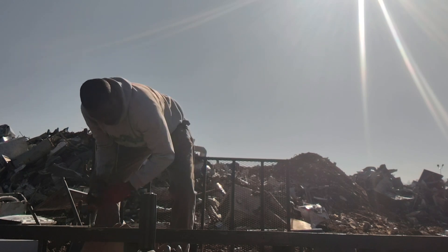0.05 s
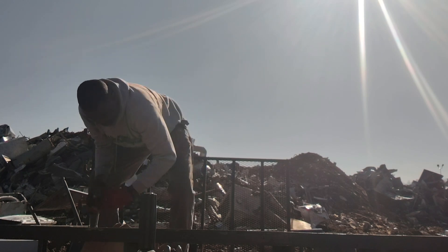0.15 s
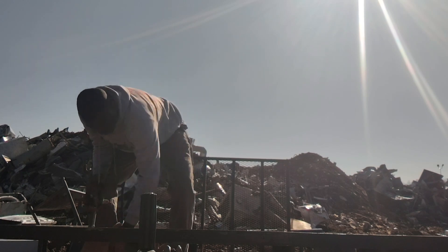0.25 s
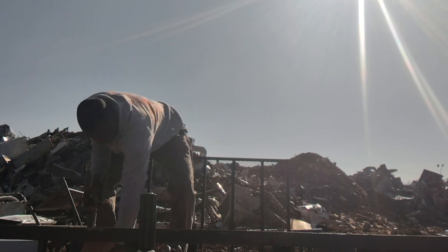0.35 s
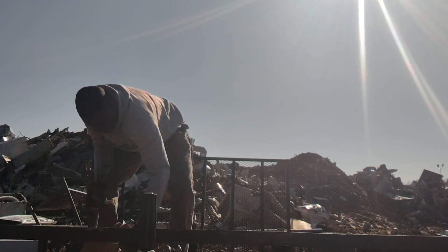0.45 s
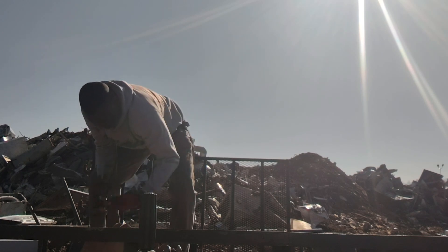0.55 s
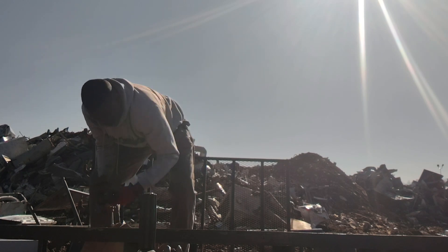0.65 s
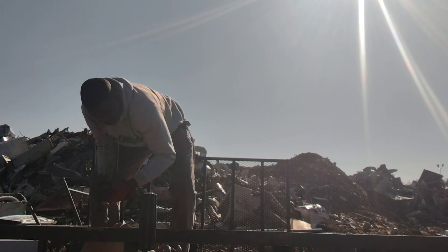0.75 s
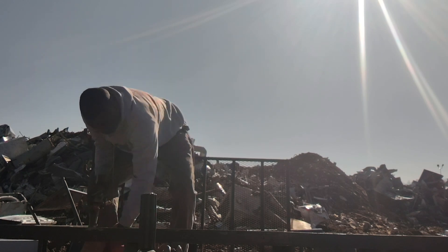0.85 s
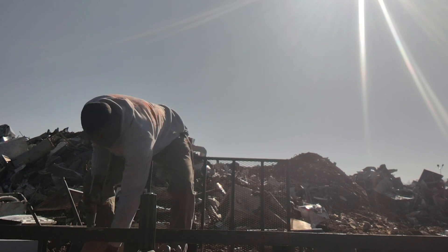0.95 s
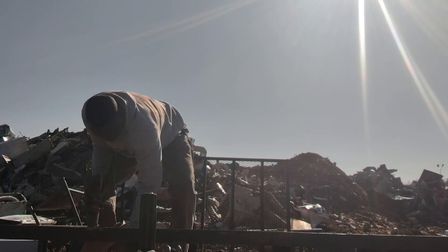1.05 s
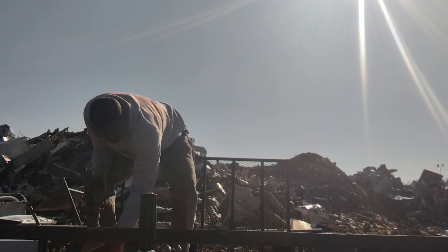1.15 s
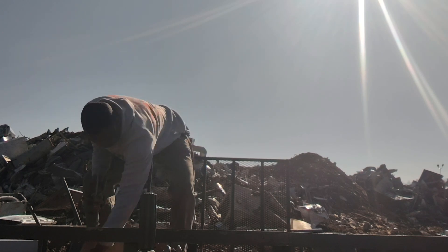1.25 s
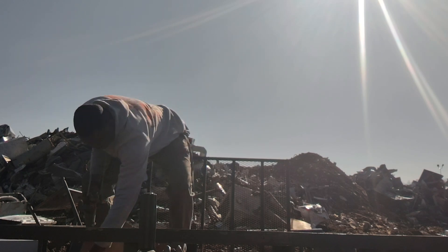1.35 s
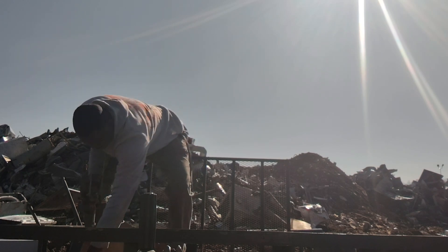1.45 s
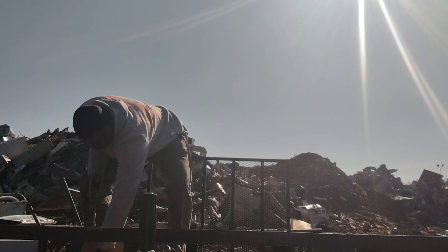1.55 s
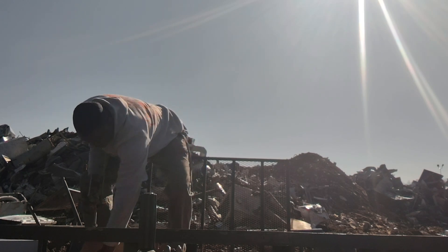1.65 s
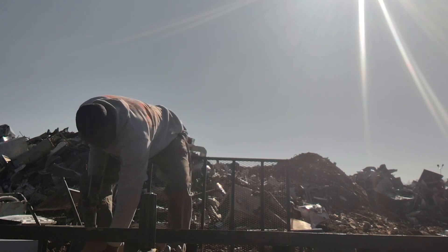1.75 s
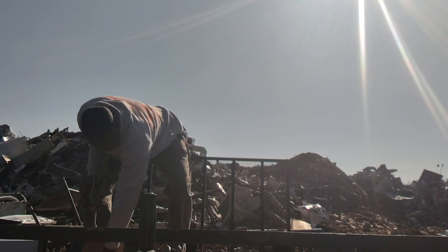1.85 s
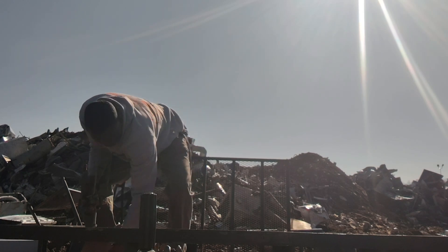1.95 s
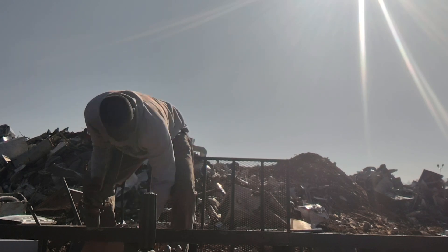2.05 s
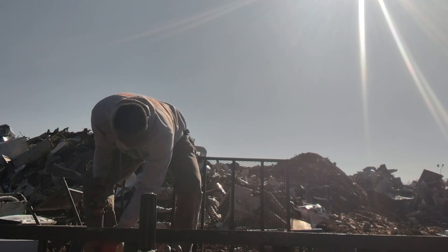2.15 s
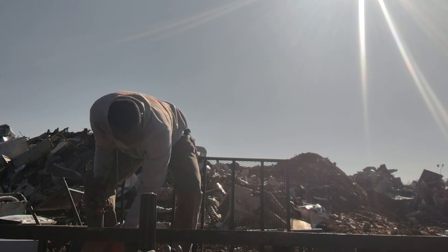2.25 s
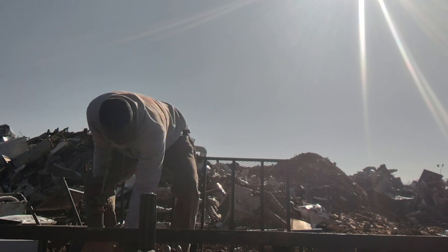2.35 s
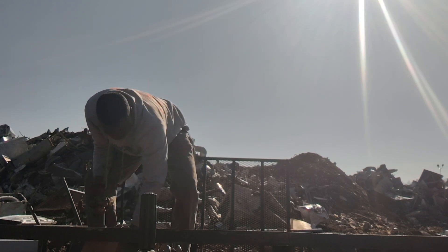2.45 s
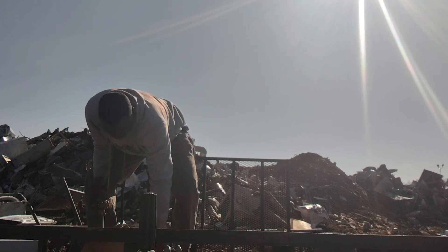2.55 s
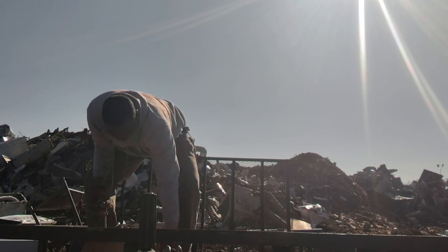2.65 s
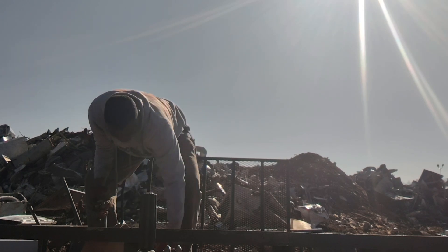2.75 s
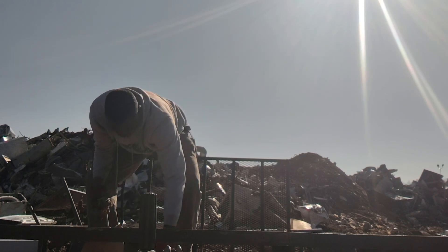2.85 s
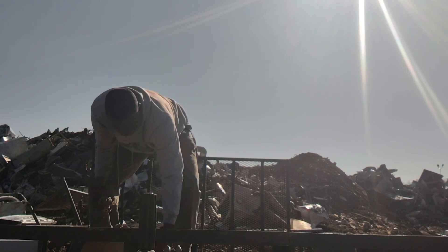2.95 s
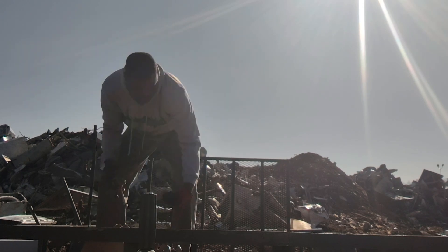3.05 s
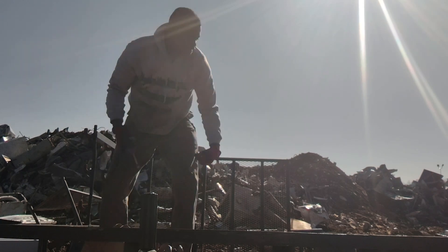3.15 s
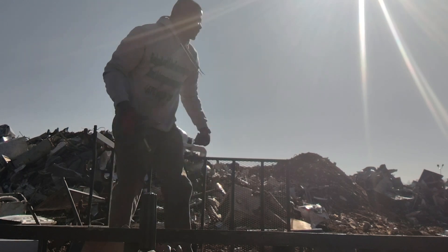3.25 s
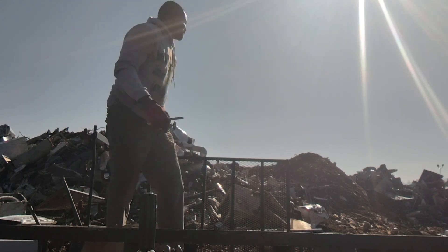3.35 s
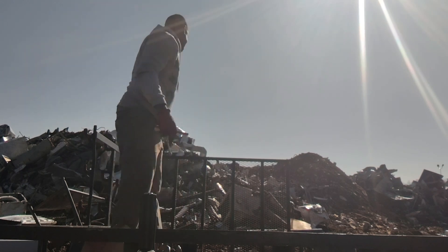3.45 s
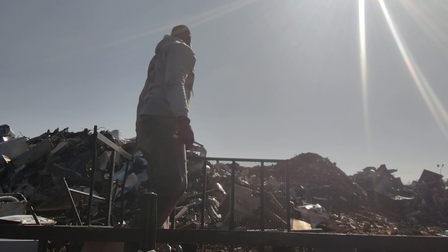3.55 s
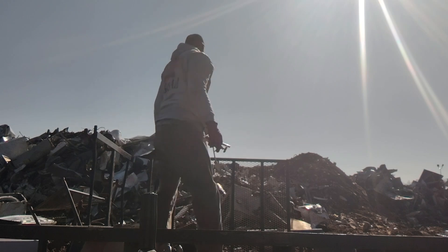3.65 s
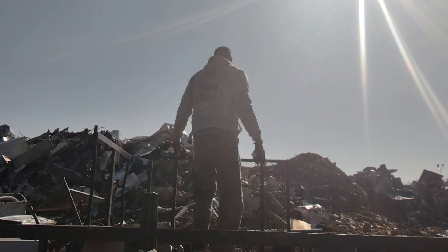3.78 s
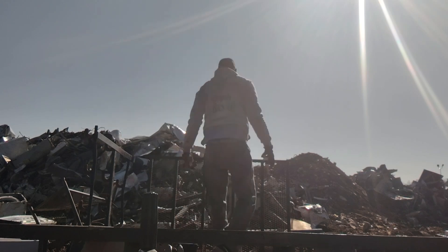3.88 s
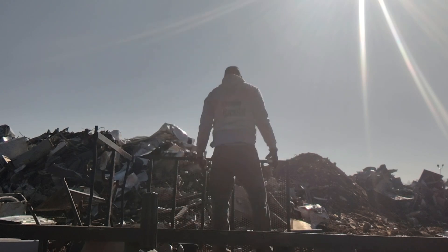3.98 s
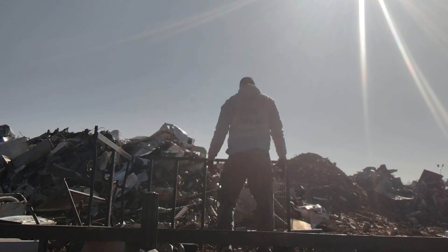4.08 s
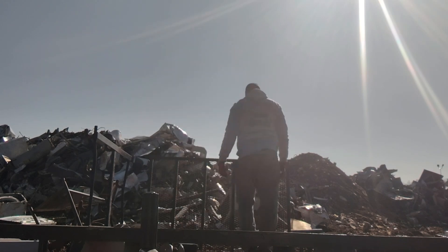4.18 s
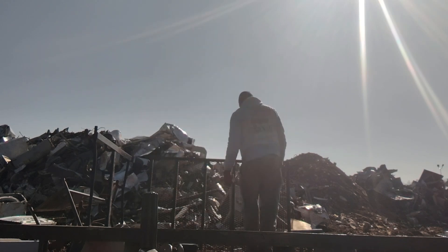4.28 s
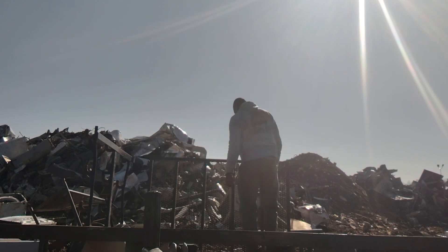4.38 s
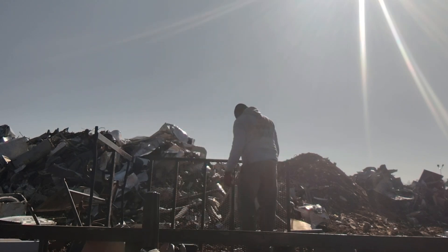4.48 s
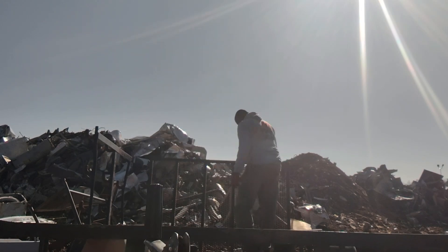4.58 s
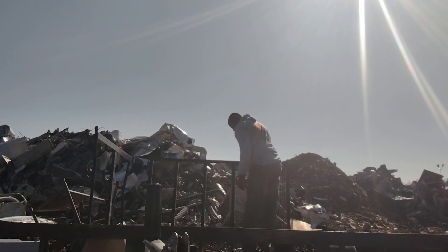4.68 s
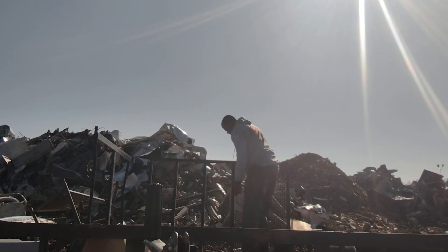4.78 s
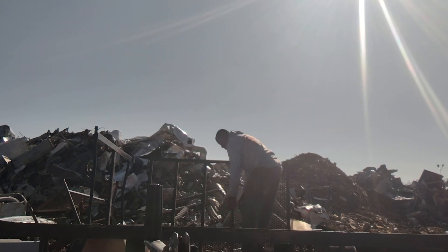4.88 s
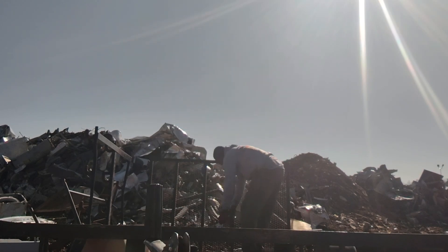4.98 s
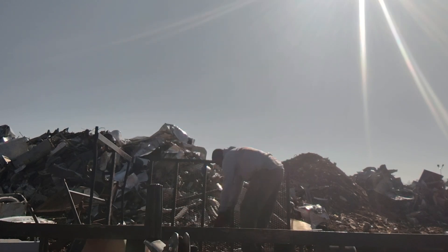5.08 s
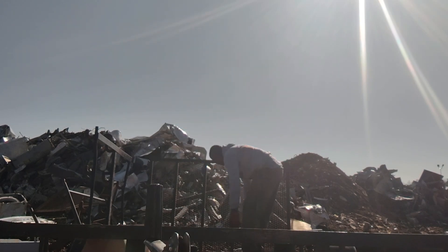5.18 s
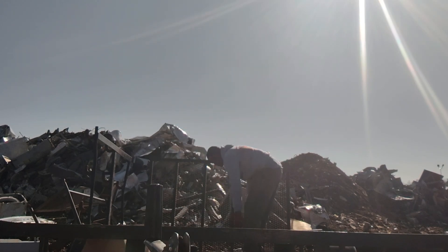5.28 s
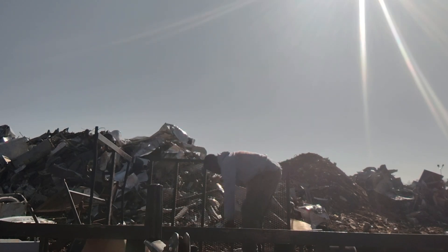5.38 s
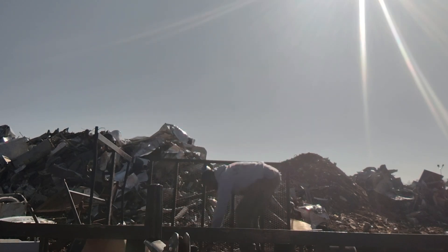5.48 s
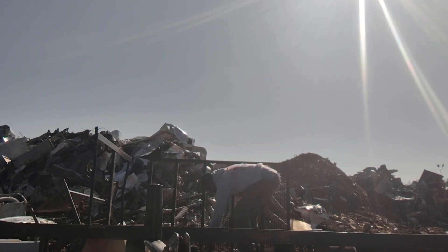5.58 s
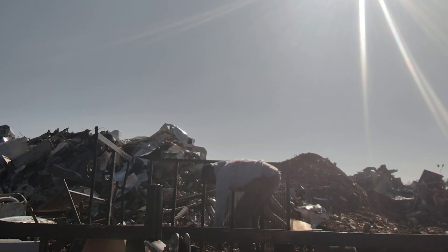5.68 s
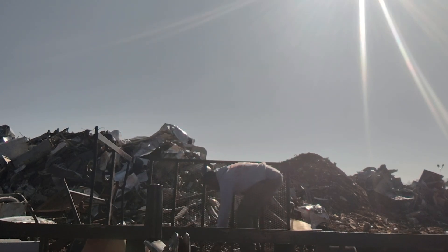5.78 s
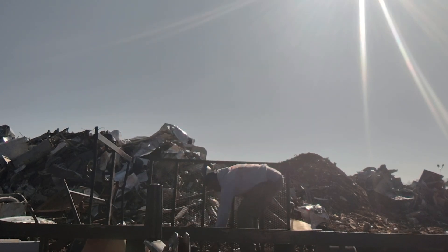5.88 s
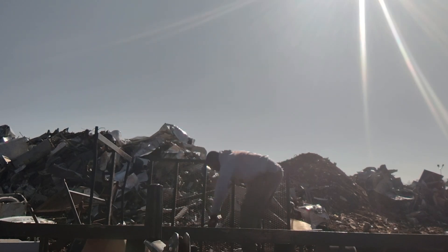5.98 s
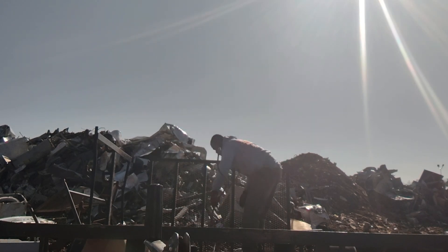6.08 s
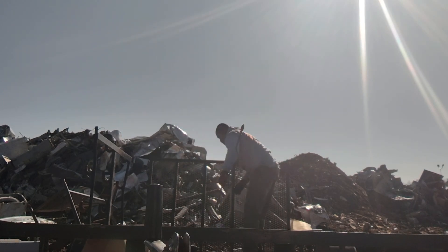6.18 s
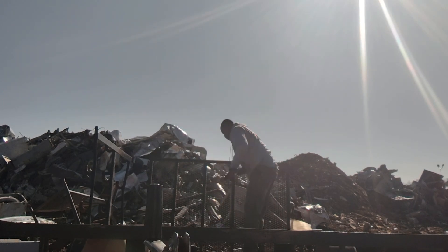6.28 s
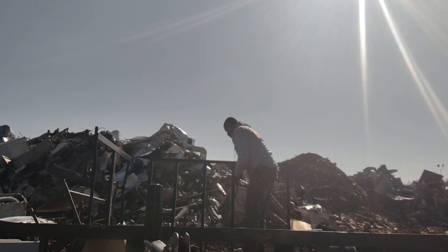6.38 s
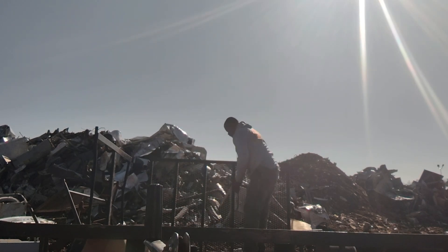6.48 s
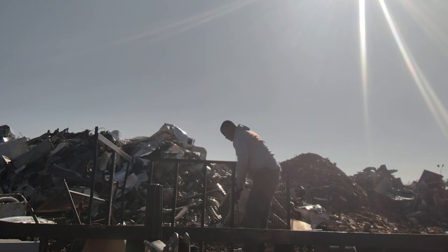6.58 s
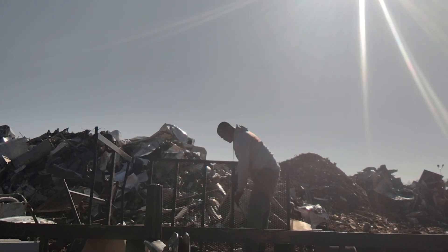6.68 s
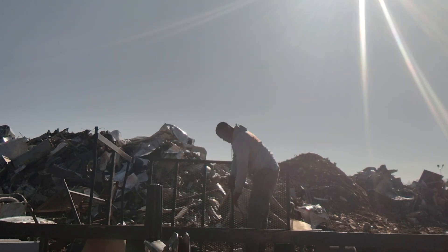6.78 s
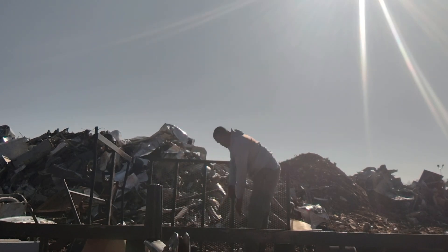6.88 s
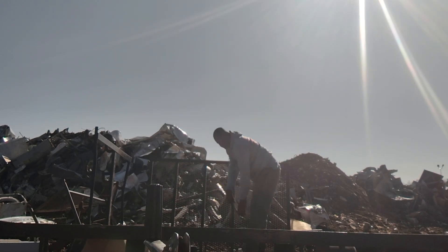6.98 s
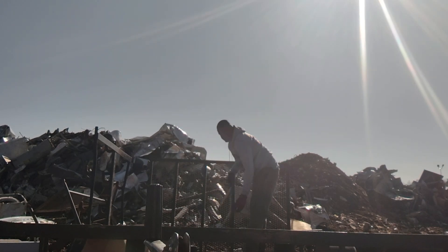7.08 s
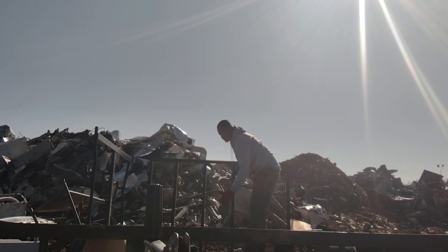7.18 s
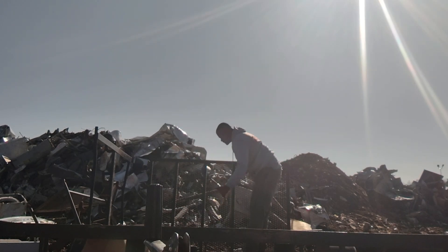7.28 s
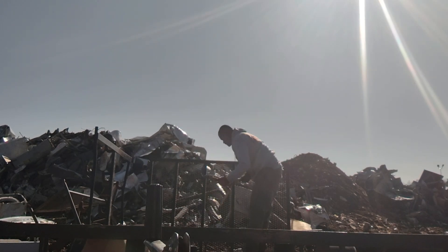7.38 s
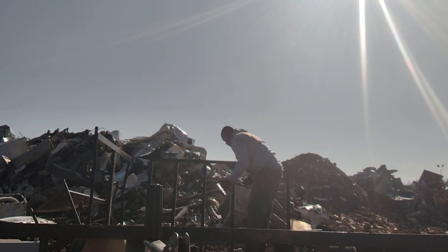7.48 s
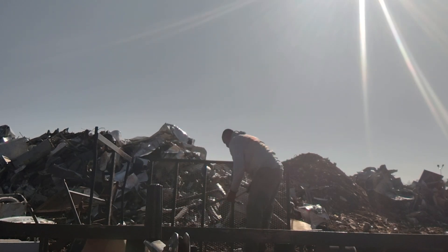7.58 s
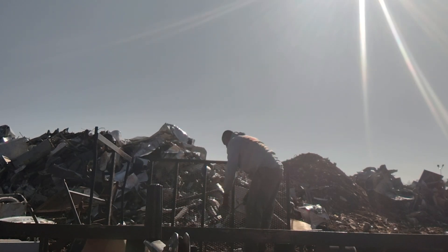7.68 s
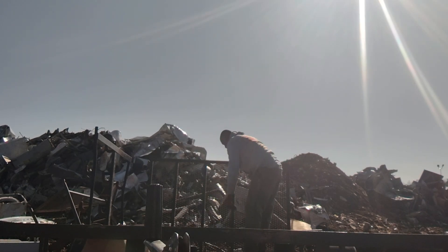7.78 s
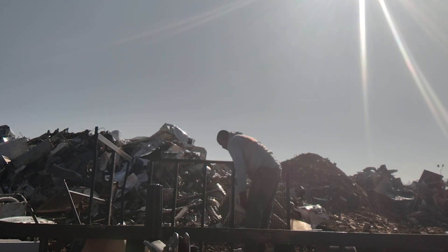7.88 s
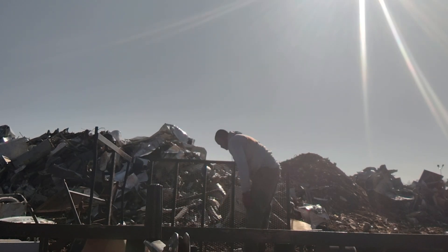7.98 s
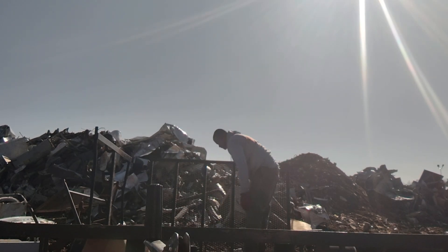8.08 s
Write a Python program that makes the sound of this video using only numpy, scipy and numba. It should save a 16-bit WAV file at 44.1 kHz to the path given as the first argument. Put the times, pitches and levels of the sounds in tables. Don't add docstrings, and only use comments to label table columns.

```python
import sys
import numpy as np
from scipy import signal
from scipy.fft import rfft, irfft
from scipy.io import wavfile
from scipy.ndimage import uniform_filter1d
from numba import njit

SR = 44100
rng = np.random.default_rng(int(sys.argv[2]) if len(sys.argv) > 2 else 0)


def undo_db(level):
    steps = np.asarray(level, float) / 20
    return 10 ** steps


def generate_wav(signal):
    frames = np.transpose(np.atleast_2d(signal))
    scaled = np.clip(frames, -1, 1) * 32767
    pcm = np.round(scaled).astype(np.int16)
    wavfile.write(sys.argv[1], SR, pcm)


N = 358533
T = np.arange(N) / SR
# [Hz, dB]
DECK_MODES = [(150, -22), (300, -4), (600, 0), (1500, 1), (2300, 0), (2900, -15), (5000, -40)]


def colour_db(table, hz):
    f, db = np.transpose(table)
    return np.interp(np.log(hz + 1), np.log(f), db)


def unit(x):
    return x / np.sqrt(np.mean(x ** 2))


def walk(rate):
    hold = int(SR / rate)
    levels = np.repeat(rng.standard_normal(N // hold + 1), hold)
    return 1.32 * uniform_filter1d(uniform_filter1d(levels, hold), hold)[:N]


def yard():
    # [Hz, dB per Hz]
    drone_colour = [(40, -36), (140, -5), (180, -6.5), (310, 7.5), (500, -2), (1400, -9.5), (3000, -38),
                    (6000, -44.5), (15000, -45)]
    # [Hz, dB rms]
    hum_lines = [(183.0, -59.5), (215.3, -68), (285.3, -55), (323.0, -52), (640.6, -63)]
    hz = np.arange(N // 2 + 1) * SR / N
    colour = undo_db(colour_db(drone_colour, hz))
    common = irfft(rfft(rng.standard_normal(N)) * colour, N)
    opposed = irfft(rfft(rng.standard_normal(N)) * colour * np.clip(hz / 2500, .35, 1), N)
    drone = unit(common + opposed * np.array([[1], [-1]])) * undo_db(-47.5)
    drone = drone * undo_db(1.5 * walk(2.5))
    hum = np.zeros(N)
    for f, db in hum_lines:
        level = undo_db(db + 5.5 + 1.6 * walk(13))
        hum += level * np.sin(2 * np.pi * f * np.cumsum(1 + .004 * walk(5.4)) / SR)
    return drone + hum


@njit
def add(out, start, hz, gain, t60, phase, rise):
    for m in range(len(hz)):
        turn = np.exp(2j * np.pi * hz[m] / SR - np.log(1000) / (t60[m] * SR))
        z, gap, close = gain[m] * np.exp(1j * phase[m]), 1., np.exp(-1 / (rise * SR))
        for i in range(start, min(len(out), start + int(t60[m] * SR))):
            out[i] += z.imag * (1 - gap)
            z, gap = z * turn, gap * close


def strike(out, s, db, hz, mode_db, t60, spread, rise, scatter=2 * np.pi):
    chance = rng.standard_normal((len(hz), 2)).T
    gain = undo_db(mode_db + 3.0 * chance[0])
    gain = gain * undo_db(db) / np.sqrt(np.sum(gain ** 2) / 2)
    life = t60 * np.exp(spread * chance[1])
    phase = rng.uniform(0, scatter, len(hz))
    add(out, int(s * SR), hz, gain, life, phase, rise)


def piece(table, lo_hz, hi_hz, t60, count):
    body = np.zeros(int(.25 * SR))
    hz = rng.uniform(lo_hz, hi_hz, count)
    strike(body, 0, 0, hz, colour_db(table, hz), t60 + 0 * hz, spread=.3, rise=.0002)
    return body / np.sqrt(np.sum(body ** 2))


def contacts(rate, force_db, smooth):
    force = undo_db(force_db * np.minimum(rng.exponential(size=N), 3))
    taps = unit((rng.random(N) < rate / SR) * force * rng.standard_normal(N))
    return unit(taps + smooth * rng.standard_normal(N)) * undo_db(.8 * walk(30))


def shoves_db(start, swell, db, t60, still_db):
    power = undo_db(2 * still_db) + 0 * T
    for s, up, top_db, down in zip(start, swell, db, t60):
        times = [s - .002, s, s + up, s + up + 2 * down]
        power = power + undo_db(2 * np.interp(T, times, [-200, top_db - 21, top_db, top_db - 120]))
    return 10 * np.log10(power)


def rattle(lo_hz, hi_hz, rate, t60, level_db):
    total = 0
    for _ in range(2):
        push = contacts(rate, force_db=3.0, smooth=0.7) * undo_db(level_db)
        total = total + signal.oaconvolve(push, piece(DECK_MODES, lo_hz, hi_hz, t60, count=110))
    return total[:N] / np.sqrt(2)


def loose_scrap():
    # [s, s, dB, dB, s]
    shoves = [(0.0, 0.033, -25.5, -27, 1.5), (.14, 0.017, -17, -21, 0.54),
              (.415, 0.0092, -48.5, -26.5, 0.55), (.43, 0.13, -25, -40, 4), (.7, 0.1, -34, -40, 0.9),
              (1.152, .048, -18, -38, 0.8), (1.46, 0.01, -20.5, -36, 0.26), (1.5, 0.055, -24, -37, 8),
              (1.9, 0.072, -19.5, -44, 0.66), (2.07, 0.074, -19.5, -29, 1.6), (2.546, 0.07, -17, -45, 0.22),
              (2.7, 0.2, -25, -35.5, 0.69), (3.133, .1, -31, -31, 1.6), (3.87, 0.2, -25.5, -33.5, 6.6),
              (4.7, 0.11, -23.5, -26, 2.9), (4.805, .035, -9, -20, .2), (4.89, .028, -10, -21, .18),
              (4.94, .03, -14, -22, .25), (5.334, 0.077, -4.5, -16, 0.85), (5.45, 0.15, -32.5, -21, 0.61),
              (5.7, 0.15, -26.5, -28.5, 1.4), (6.024, 0.034, -15, -48, 0.12), (6.05, 0.028, -28, -36, 1.9),
              (6.329, 0.044, -24, -60, 0.33), (6.85, 0.067, -34.5, -34, 1.6),
              (7.748, 0.024, -30, -27.5, 2.9), (7.971, 0.098, -4, -22.5, 4.1)]
    s, swell, *peaks_db, settle = np.transpose(shoves)
    rattle_db, rumble_db = (shoves_db(s, swell, db, settle, still_db=-67) for db in peaks_db)
    bright = rattle(742, 3500, 220, 0.015, rattle_db - 14.5)
    return bright + rattle(197.4, 743, 200, 0.043, rumble_db - 5.5)


def knocks():
    # [s, dB, Hz, s]
    ahead_blows = [(0.7104, -15, 1750, 0.014), (1.318, -26, 990, 0.042), (1.906, -30, 1270, 0.011),
                   (2.425, -22, 960, 0.041), (2.591, -24, 1687, 0.12), (2.6446, -11, 2290, 0.02),
                   (2.784, -20, 1034, 0.049), (4.178, -26, 1392, 0.29), (4.843, -20, 1050, 0.04),
                   (4.918, -22, 1090, 0.04), (5.081, -21, 1108, 0.12), (5.213, -17, 1190, 0.017),
                   (5.363, -2, 1457, 0.035), (5.418, -20.5, 1165, 0.044), (5.451, -19, 1062, 0.27),
                   (5.521, -8.5, 1411, 0.071), (5.882, -22, 1207, 0.033), (5.96, -21, 1800, 0.037),
                   (6.056, -2.5, 1730, 0.012), (6.066, -22.5, 1108, 0.24), (6.117, -17.5, 1314, 0.031),
                   (6.165, -20, 426, 0.059), (6.237, -22, 910, 0.05), (6.345, -17.5, 1370, 0.017),
                   (6.398, -10, 1730, 0.03), (6.871, -3, 1439, 0.024), (8.025, -0.5, 1423, 0.052),
                   (8.045, -3, 1510, 0.021), (8.082, -12.5, 1391, 0.31)]
    # [s, dB, Hz, s]
    side_blows = [(0.04, -21.5, 738, 0.043), (0.155, -12.5, 505.5, 0.11), (0.239, -25, 438, 0.052),
                  (0.774, -36, 1260, 0.033), (1.259, -33, 1360, 0.11), (1.523, -26, 1546, 0.1),
                  (1.976, -23.5, 1099, 0.12), (2.117, -21, 1130, 0.055), (5.346, -28.5, 702, 0.4),
                  (5.579, -10, 523.7, 0.15), (6.369, -37, 1400, 0.021)]
    # [s, dB, Hz]
    small_ticks = [(0.646, -25, 1660), (0.681, -17, 1640), (0.726, -21, 1710), (0.737, -22, 2160),
                   (1.742, -20, 1320), (2.019, -19, 1700), (2.031, -20, 1500), (2.065, -19, 1310),
                   (2.118, -8, 2000), (2.088, -14, 1110), (2.388, -22, 1610), (2.492, -20, 1100),
                   (2.505, -16, 1560), (2.789, -12, 962), (4.844, -20, 1620), (5.087, -10, 1560),
                   (5.382, -5, 980), (5.535, 1, 1600), (5.806, -14, 1190), (6.097, -14, 1760),
                   (6.194, -26, 1180), (6.264, -16, 1030), (6.372, -16.5, 1450), (6.419, -24, 1980),
                   (8.094, -6, 1750), (8.126, 1, 1450)]
    blows = [(*blow, 0) for blow in ahead_blows] + [(*blow, 1) for blow in side_blows]
    blows += [(s, db - 7.0, hz, 0.011, 0) for s, db, hz in small_ticks]
    out = np.zeros((2, N))
    for s, db, centre_hz, t60, place in blows:
        hz = centre_hz * np.exp(rng.triangular(-1., 0, .85, 70))
        strike(out[place], s, db - 0.2, hz, colour_db(DECK_MODES, hz), max(t60, .008) + 0 * hz,
               spread=0.4, rise=0.0004, scatter=5.43)
    return out


def notes():
    # [s, s, s, Hz, dB]
    free_bars = [(0.159, 0.0026, 0.054, 439, -12.5), (0.431, 0.0031, 0.018, 5700, -15.5),
                 (0.44, 0.02, 0.24, 3450, -13.5), (0.43, .004, .03, 4080, -19),
                 (0.568, .012, .04, 5600, -32), (0.436, 0.018, 0.07, 6890, -23),
                 (1.494, 0.039, 0.1, 3550, -26), (0.768, 0.006, 0.087, 2170, -24.5),
                 (1.909, 0.002, 0.011, 9300, -9), (1.982, 0.0039, 0.12, 492, -30),
                 (2.038, 0.011, 0.034, 8400, -27), (2.717, 0.0055, 0.08, 610, -31),
                 (2.728, 0.018, 0.017, 5881, -24), (2.837, 0.0054, 0.06, 8500, -24),
                 (2.841, 0.016, 0.047, 5855, -16), (4.392, 0.013, 0.02, 6120, -36.5),
                 (4.65, .006, .03, 4000, -38), (4.684, 0.011, 0.014, 4150, -33),
                 (4.826, .005, .04, 4000, -28.5), (4.966, .006, .03, 1450, -24),
                 (5.847, .01, 0.069, 5800, -44), (6.13, .006, 0.027, 5520, -40),
                 (2.356, 0.0054, 0.025, 5480, -40), (8.045, .003, 0.015, 8300, -20),
                 (4.957, 0.014, 0.045, 455, -25)]
    # [s, s, s, Hz, dB]
    damped_bars = [(0.458, 0.012, 0.02, 4070, -17.5), (0.485, 0.011, 0.025, 8650, -25),
                   (1.492, 0.04, 0.05, 5949, -22), (2.716, 0.008, 0.06, 5085, -27),
                   (2.836, .05, .05, 5085, -23), (1.4966, 0.0049, 0.028, 4470, -26),
                   (2.04, 0.006, 0.04, 5450, -29), (1.5037, 0.062, 0.081, 1298, -29),
                   (1.5572, 0.015, 0.057, 1168, -31), (2.1046, 0.065, 0.1, 1170, -25),
                   (2.113, 0.12, 0.04, 607, -33), (2.235, 0.0091, 0.1, 711, -32),
                   (2.865, 0.09, 0.071, 1061, -18), (5.401, 0.04, 0.075, 11030, -11),
                   (7.775, .02, .06, 2950, -30), (5.526, .004, .012, 5850, -25),
                   (5.408, 0.045, 0.03, 4208, -16.5), (5.55, 0.063, 0.0091, 470, -24),
                   (5.608, 0.0038, 0.062, 804, -28.5)]
    bars = [(*bar, -22) for bar in free_bars] + [(*bar, -8) for bar in damped_bars]
    out, tremble = np.zeros(N), walk(90)
    for s, swell, fade, hz, db, fall_db in bars:
        beat_hz, phase = rng.random(2) * [22, 2 * np.pi]
        t = np.arange(int((swell + fade + 0.04) * SR)) / SR
        times = [0, .004, swell + 0.011, swell + fade, swell + fade + 0.045]
        level_db = np.interp(t, times, [-30, -10, 0, fall_db, fall_db - 34.5])
        wobble = hz / 14000 * tremble[int(s * SR):][:len(t)]
        tone = np.sin(2 * np.pi * hz * t + wobble)
        tone = tone + .13 * np.sin(2 * np.pi * (hz + 8 + beat_hz) * t + phase)
        i = int((s - .008) * SR)
        flutter_db = 2.2 * min(hz / 3000, 1) * tremble[i:i + len(t)]
        out[i:i + len(t)] += np.sqrt(2) * (undo_db(db + level_db) * tone)[:N - i] * undo_db(flutter_db)
    return out


def handled(push):
    # [s, s, dB, dB]
    holds = [
        (0.415, .62, -2.5, -5.5),
        (.758, 0.868, -2, -2),
        (1.475, 1.822, -2, -3),
        (2.085, 2.324, -2.5, -2.5),
        (2.704, 2.825, -2, -3),
        (2.824, 3.03, -5, -2),
        (7.752, 8.002, -10, -1),
    ]
    # [Hz, Hz, dB]
    bar = [(630, 83.6, -11.5), (2683, 27, -29.5), (3460, 28, 2.5), (4050, 50, -9), (5700, 49, -11),
           (6370, 57, -9.5), (6940, 86, -7), (8680, 200, -11), (9900, 51, -15.5), (10700, 66, -12.5),
           (10900, 69, -11.5), (11900, 82, -15.5), (12700, 35, -13.5), (13700, 80, -16.5)]
    # [Hz, Hz, dB]
    bar_turned = [(1250, 32, -1.5), (2110, 48, -2), (3500, 31, -0.5), (4050, 36, -5), (5730, 36, -9.5),
                  (6260, 38, -17), (6870, 54, -10), (9760, 55, -15), (10400, 44, -9), (10930, 48, -10),
                  (12100, 32, -5.5), (12100, 31, -4.5), (12400, 37, -1), (13500, 47, -6.5)]
    # [Hz, Hz, dB]
    plate = [(1320, 70, -1), (1750, 22, -5.5), (2740, 35, 0), (3600, 120, -6), (4510, 61, -8),
             (4980, 91, -14), (5920, 52, -8), (6830, 64, -13.5), (7500, 92.5, -13), (8480, 130, -17),
             (9440, 65, -12.5), (10500, 65, -15), (11800, 82, -15.5), (13000, 45, -13)]
    # [Hz, Hz, dB]
    plate_dragged = [(606, 34, -10.5), (1116, 43, 1), (1750, 24, -7), (3660, 42, -6), (4620, 34, -21),
                     (5090, 56, -16), (5880, 200, -11.5), (6780, 95, -11), (7590, 32, -12), (8400, 41, -19),
                     (9170, 52, -21), (9500, 99, -20), (12300, 180, -20), (13500, 180, -22)]
    # [Hz, Hz, dB]
    plate_dropped = [(610, 27, -3.5), (1050, 70, -5), (4510, 35, -8), (5090, 23, -3), (5240, 32, -2),
                     (5830, 57, -1), (6980, 45, -13), (8560, 67, -6), (9040, 32, -11), (10000, 65, -14),
                     (10500, 44, -16), (11200, 29, -19.5), (12400, 65, -15), (13500, 33, -13)]
    # [Hz, Hz, dB]
    plate_free = [(4610, 39, -23), (5090, 25, -5.5), (5270, 45, -10), (5790, 30, -7), (6650, 37, -15),
                  (7320, 48, -19), (7640, 43, -15.5), (8510, 50, -15), (11300, 53, -20), (11900, 59, -24),
                  (12400, 44, -24), (13200, 36, -23)]
    # [Hz, Hz, dB]
    sheet = [(802, 88, -3), (1046, 43, -2), (1240, 27, -1), (1677, 81, -5), (2110, 34, -14), (3070, 60, -8),
             (3920, 110, -3), (4400, 66, -4.5), (4570, 27, -5.5), (5400, 54, -1.5), (7050, 71, -8.5),
             (7400, 31, -11), (7900, 54, -9), (8410, 38, -12)]
    pieces = bar, bar_turned, plate, plate_dragged, plate_dropped, plate_free, sheet
    out, behind = np.zeros(N + SR), np.ones(N)
    for (start_s, end_s, ring_db, heap_db), modes in zip(holds, pieces):
        hz, width, mode_db = np.transpose(modes)
        t60 = np.clip(3.2 / width, .01, .3)
        body = np.zeros(int(.3 * SR))
        add(body, 0, hz, undo_db(mode_db) / t60, t60, 0 * hz, .0001)
        a, b = int(start_s * SR), int(end_s * SR)
        ring = signal.oaconvolve(push[a:b], body / np.sqrt(np.sum(body ** 2)))
        out[a:a + len(ring)] += undo_db(ring_db) * ring
        behind[a:b] = undo_db(heap_db)
    return out, behind


def clanks():
    # [s, dB, s]
    clash_events = [(0.065, -13.5, 0.032), (0.16, -12.5, 0.37), (0.4257, -19, 0.035), (0.6808, -5.5, 0.012),
                    (0.7119, -8.5, 0.013), (0.7601, 2.5, 0.023), (1.1832, -24, 0.067),
                    (1.263, -18.5, 0.086), (1.4865, -6, 0.041), (1.629, -7, 0.15), (1.803, -21, 0.044),
                    (1.908, 2.5, 0.01), (1.9766, -13, 0.07), (2.034, -26, 0.041), (2.092, -4, 0.047),
                    (2.329, -20, 0.063), (2.908, -12, .02), (2.506, -28, 0.078), (2.584, -8, 0.055),
                    (2.605, -10, 0.085), (2.6437, -1.5, 0.014), (2.7085, 3.5, 0.021), (2.827, -1, 0.03),
                    (3.023, -19.5, 0.093), (3.1878, -28, 0.48), (3.341, -25, 0.047), (3.416, -30, .04),
                    (3.515, -28, 0.074), (3.569, -32, .04), (3.63, -19.5, 0.033), (3.815, -22, 0.23),
                   (4.177, -12, 0.056), (4.3119, -21.5, 0.13), (4.6092, -24, 0.21), (4.728, -22, 0.1),
                   (4.784, -0.5, 0.012), (4.827, -10, 0.044), (4.9002, -14.5, 0.092), (4.9703, -14, 0.11),
                   (5.044, -12.5, 0.065), (5.0825, -13.5, 0.049), (5.137, -19, 0.064),
                   (5.2409, -18.5, 0.13), (5.2967, -18.5, 0.023), (5.363, -11, 0.052),
                   (5.402, -10.5, 0.014), (5.489, -11, .03), (5.5212, 1.5, 0.016), (5.8031, -8.5, 0.034),
                   (5.8449, -14, 0.058), (6.031, -6, 0.05), (6.0692, 0, 0.025), (6.265, -23, 0.029),
                   (6.347, -17.5, 0.023), (6.3968, -4, 0.024), (6.8735, -24, 0.054), (6.911, -18, 0.21),
                   (7.139, -35.5, 0.21), (7.7515, -11.5, 0.081), (8.0463, -10, 0.15)]
    # [s, s, dB, s, dB]
    slide_events = [(0.0, 0.057, -32, 0.43, -2), (0.14, 0.013, -37, 0.45, -4), (0.418, 0.008, -14.5, 0.3, 1),
                    (.45, 0.056, -31.5, 0.099, 9), (.541, 0.018, -27.5, 0.65, -3.5),
                    (0.76, 0.011, -15, 0.28, -5), (.85, 0.063, -47, 2.6, -9), (1.171, .012, -40, 2.1, -3),
                    (1.473, 0.017, -13, 0.56, -3), (1.56, 0.13, -23.5, 0.77, -5),
                    (1.85, .065, -33, 0.19, -0.5), (1.974, 0.06, -27, 0.27, -4.5),
                    (2.085, 0.016, -12.5, 0.68, -5.5), (2.584, 0.046, -21.5, 0.11, -2),
                    (2.705, 0.0089, -17.5, 0.31, -5.5), (2.825, 0.0093, -16.5, 0.45, 0),
                    (3.173, 0.036, -32, 0.6, -2.5), (3.4, .1, -45, 2.5, 0.5),
                    (3.624, 0.011, -38, 0.77, 0.5), (3.783, 0.094, -35.5, 0.36, -4.5),
                  (3.975, 0.065, -32, 0.44, -6), (4.165, 0.0086, -40, 0.55, -25),
                  (4.26, 0.068, -44, 6.9, -6.5), (4.781, 0.0033, -18.5, 0.084, -2),
                  (4.818, 0.015, -21.5, 0.14, -9.5), (4.879, 0.026, -29.5, 0.67, -9),
                  (5.027, 0.022, -34, .31, -4.5), (5.122, 0.02, -36.5, 0.64, -4),
                  (5.206, 0.057, -31.5, 0.15, -3), (5.335, 0.047, -24, 0.55, -3.5),
                  (5.38, 0.1, -20, 0.49, -4), (5.789, 0.018, -40, 1.9, -1.5),
                  (5.996, 0.063, -26.5, 0.37, -1), (6.15, 0.22, -42.5, 0.8, -12),
                  (6.799, 0.15, -31.5, 0.3, -6), (7.749, 0.011, -14, 0.95, -1.5),
                  (7.87, .04, -28.5, .7, -12), (8.0, 0.067, -24, 2.1, -13.5)]
    # [Hz, dB]
    scrap_modes = [(150, -47), (500, -12.5), (1200, 1), (3600, 4.5), (5000, -1), (8000, -5), (15000, -10.5),
                   (16500, -38.5)]
    clashes = clash_events
    s, swell, db, settle, thin_db = np.transpose(slide_events)
    level_db = shoves_db(s, swell, db, settle, still_db=-58.5)
    top_db = shoves_db(s, swell, db + thin_db, settle, still_db=-65) - level_db
    push = contacts(1500, force_db=1.5, smooth=0.49) * undo_db(level_db - 2.5)
    out, behind = handled(push)
    push = push * behind
    hard = push * undo_db(np.clip(.5 * (level_db + 22), -12, 0))
    clash_starts = [int(row[0] * SR) for row in clashes]
    edges = sorted({*clash_starts, *range(0, N, SR // 10), N})
    for a, b in zip(edges, edges[1:]):
        ring = signal.oaconvolve(hard[a:b], piece(scrap_modes, 500, 16300, t60=.04, count=220))
        out[a:a + len(ring)] += undo_db(-1.5) * ring
    colour = undo_db(colour_db(scrap_modes, np.arange(N // 2 + 1) * SR / N))
    out[:N] += undo_db(-1.0) * irfft(rfft(push) * colour, N) / np.sqrt(np.mean(colour ** 2))
    for t, peak_db, t60 in clashes:
        hz = rng.uniform(700, 16300, 500)
        strike(out, t, peak_db - 11.5, hz, colour_db(scrap_modes, hz), np.clip(t60, .01, .4) + 0 * hz,
               spread=0.27, rise=0.000067, scatter=5.6)
    top = signal.sosfilt(signal.butter(2, 8000, "high", fs=SR, output="sos"), out[:N])
    return out[:N] - top + top * undo_db(top_db + 8.0)


def heaps(x, t60, db, bass_hz):
    t, step = np.arange(int(.14 * SR)) / SR, 2048
    shape = undo_db(-60 * t / t60) * (1 - np.exp(-t / 0.00113))
    x = signal.sosfilt(signal.butter(4, bass_hz, "high", fs=SR, output="sos"), x)
    out = np.zeros((2, N + SR))
    for a in range(0, N, step):
        tails = shape * rng.standard_normal((2, len(t)))
        echo = signal.fftconvolve(x[None, a:a + step], tails, axes=1)
        out[:, a:a + echo.shape[1]] += echo
    return undo_db(db) * out[:, :N] / np.sqrt(np.sum(shape ** 2))


def late_port(right):
    lag_samples = 7.15
    hz = np.arange(N // 2 + 1) * SR / N
    shadow = undo_db(colour_db([(4000, 0.85), (8000, -6.0), (15000, -7.5)], hz))
    return irfft(rfft(right) * shadow * np.exp(-2j * np.pi * hz * lag_samples / SR), N)


def scene():
    ahead, beside = knocks()
    ahead = ahead + loose_scrap()
    clatter = clanks() + beside
    right = clatter + notes()
    direct = np.array([late_port(right), right]) + ahead
    scatter = heaps(clatter, 0.019, -0.96, 3740) + heaps(ahead, 0.21, -5.5, 550)
    return direct + scatter + yard()


def band_limit(x):
    return signal.sosfilt(signal.butter(12, 16520, fs=SR, output="sos"), x)


def record(dry):
    x = signal.sosfilt(signal.butter(3, 170, "high", fs=SR, output="sos"), dry)
    own = rng.standard_normal(N) + 0.88 * rng.standard_normal((2, N))
    x = x + undo_db(-72.0) * unit(signal.sosfilt(signal.butter(2, 130, fs=SR, output="sos"), own))
    rounded = np.tanh(.95 * x) / .95
    mix = signal.sosfilt(signal.ellip(8, .2, 60, 16200, fs=SR, output="sos"), rounded)
    return band_limit(mix)


dry = scene()
out = record(dry)
generate_wav(out)
```